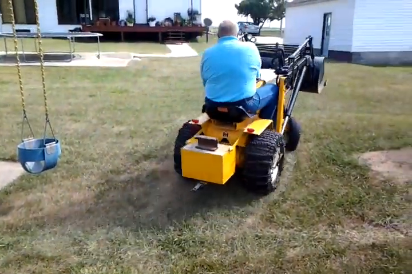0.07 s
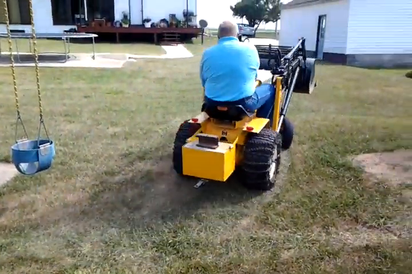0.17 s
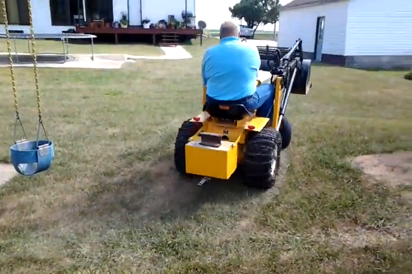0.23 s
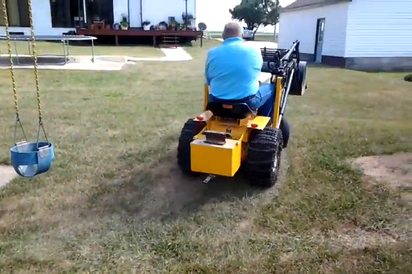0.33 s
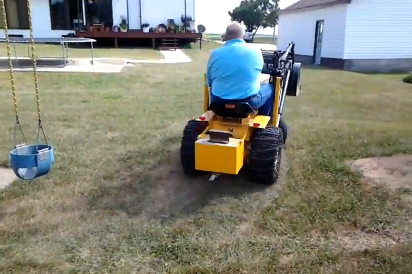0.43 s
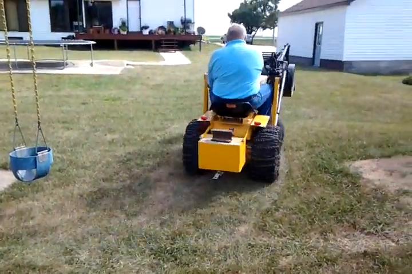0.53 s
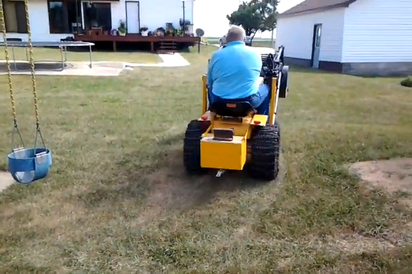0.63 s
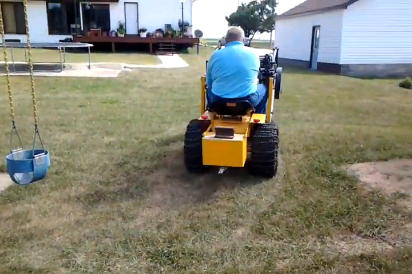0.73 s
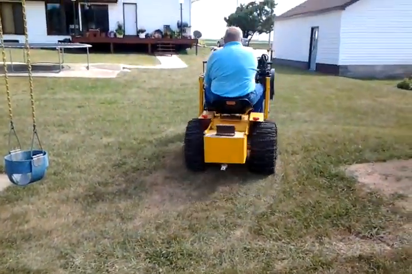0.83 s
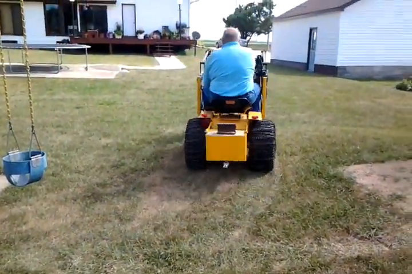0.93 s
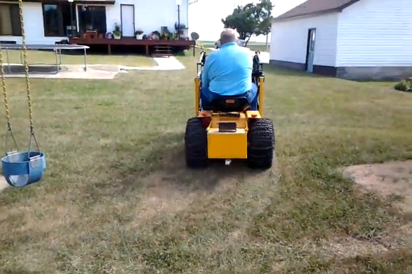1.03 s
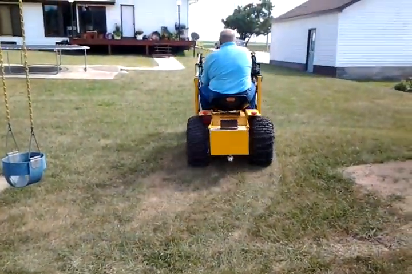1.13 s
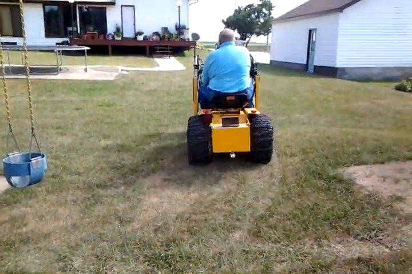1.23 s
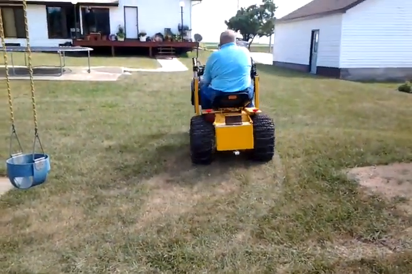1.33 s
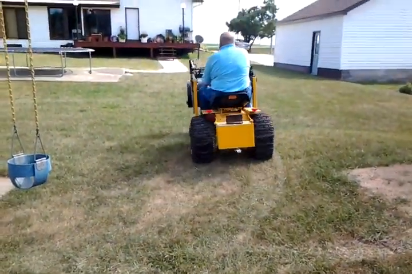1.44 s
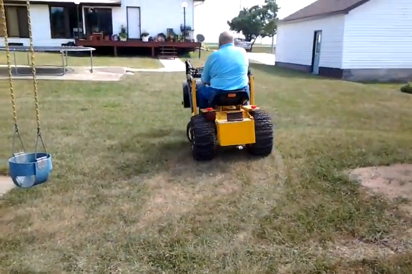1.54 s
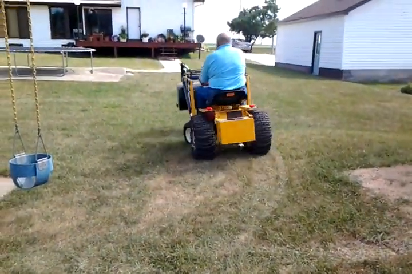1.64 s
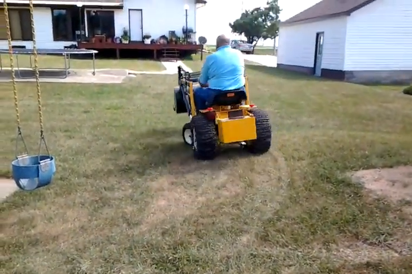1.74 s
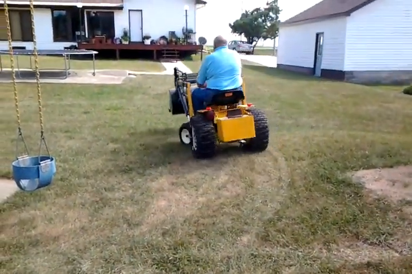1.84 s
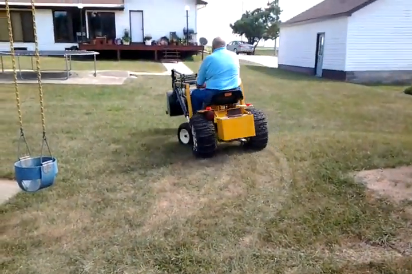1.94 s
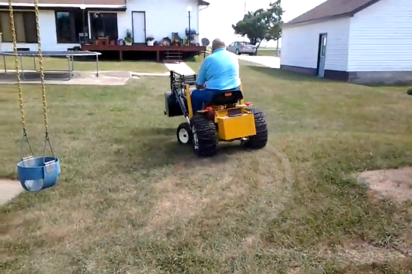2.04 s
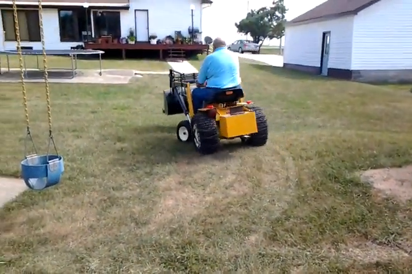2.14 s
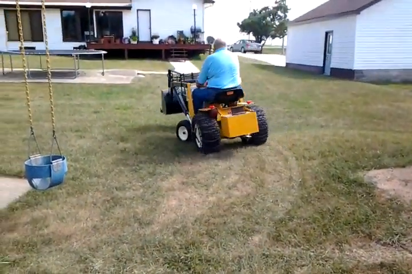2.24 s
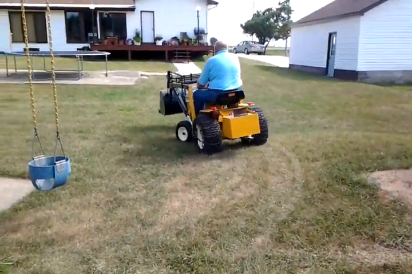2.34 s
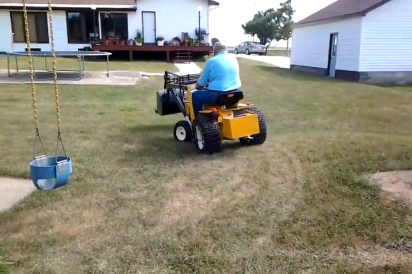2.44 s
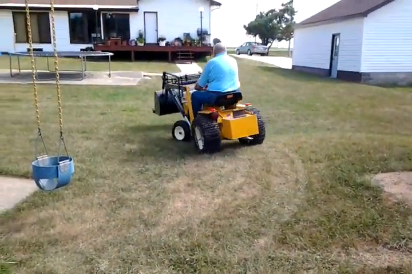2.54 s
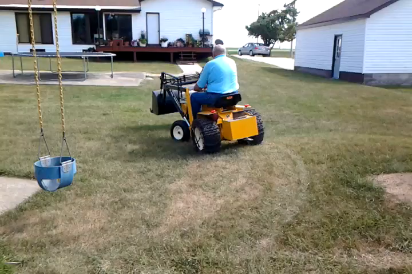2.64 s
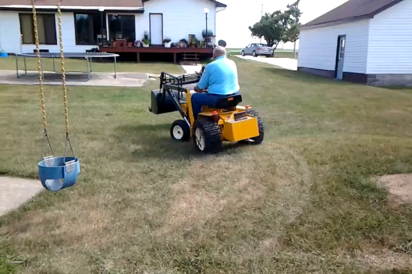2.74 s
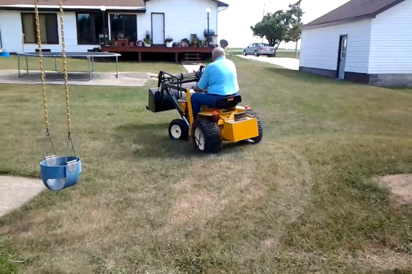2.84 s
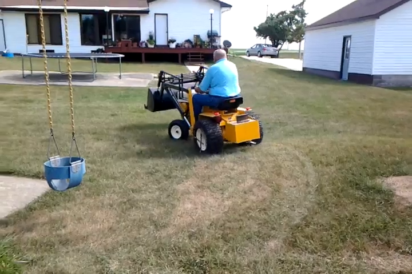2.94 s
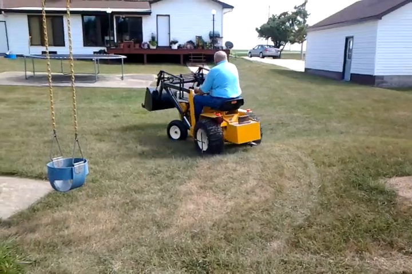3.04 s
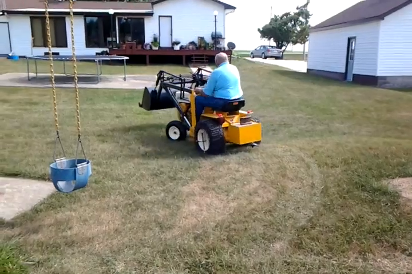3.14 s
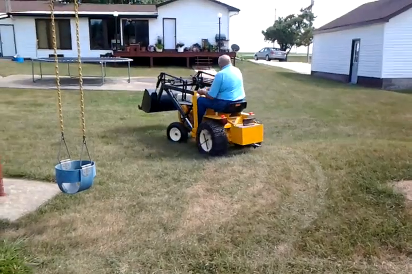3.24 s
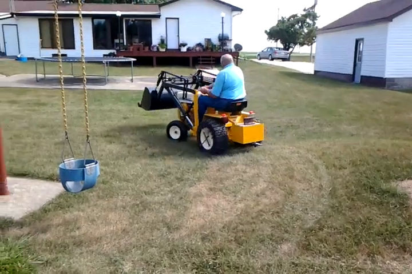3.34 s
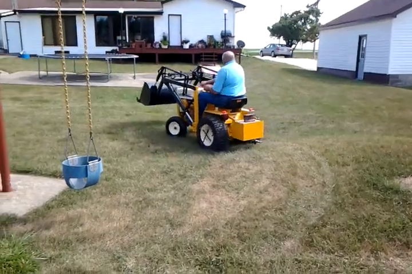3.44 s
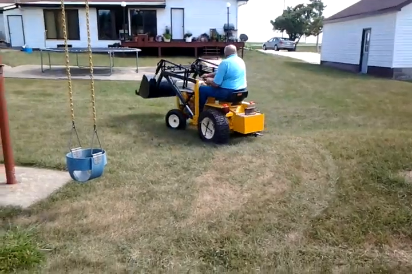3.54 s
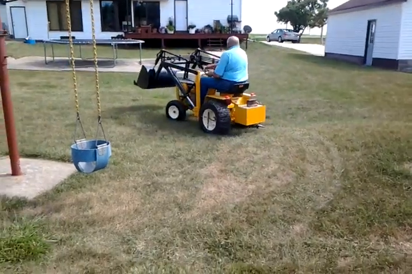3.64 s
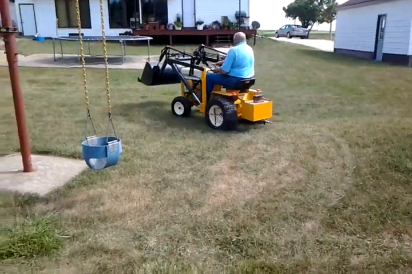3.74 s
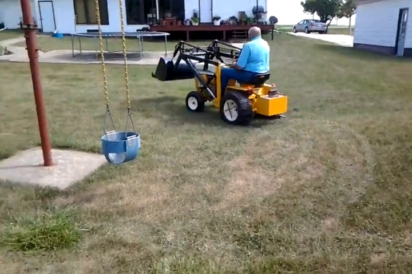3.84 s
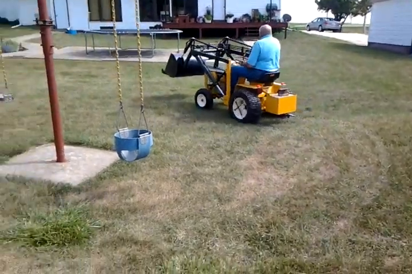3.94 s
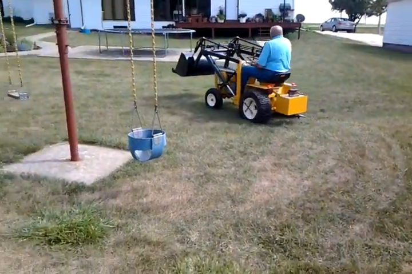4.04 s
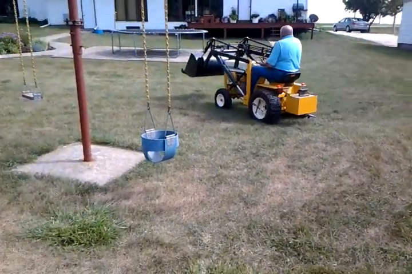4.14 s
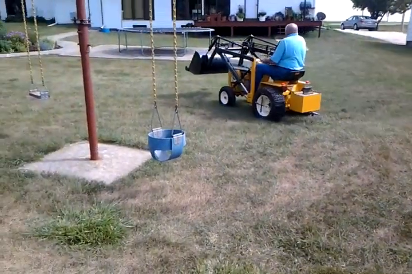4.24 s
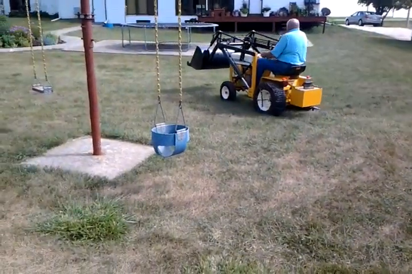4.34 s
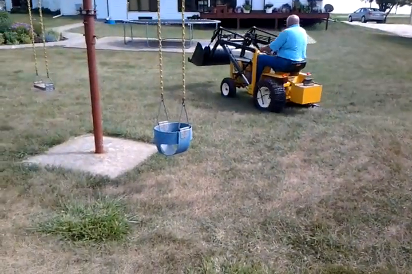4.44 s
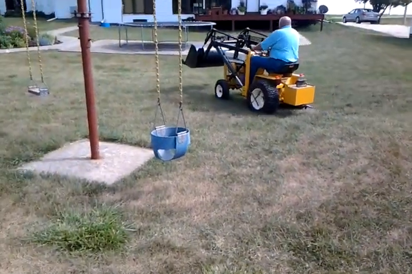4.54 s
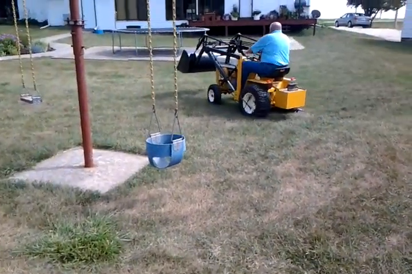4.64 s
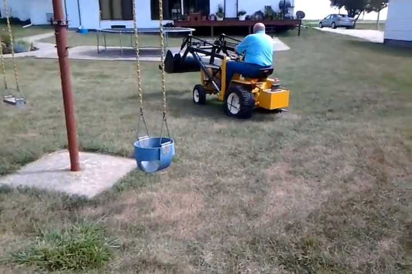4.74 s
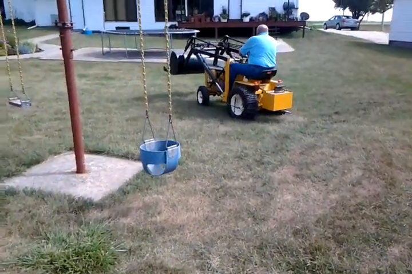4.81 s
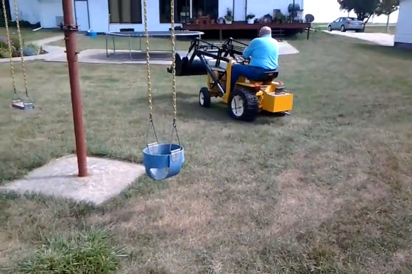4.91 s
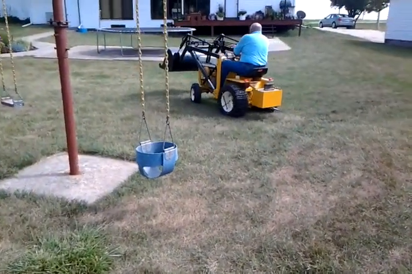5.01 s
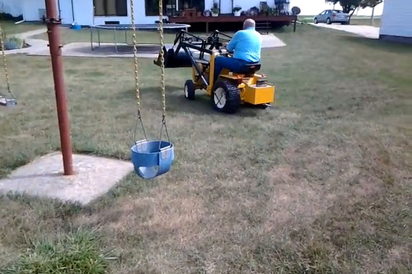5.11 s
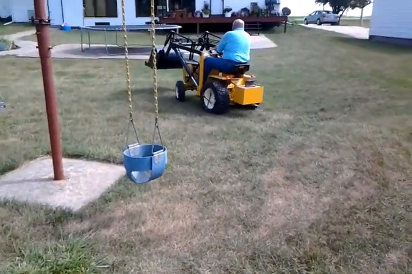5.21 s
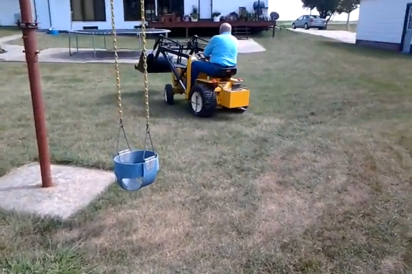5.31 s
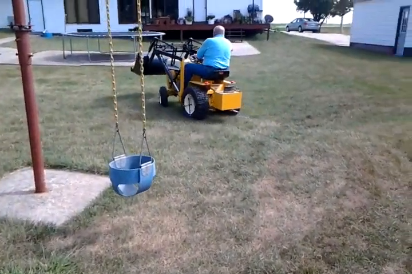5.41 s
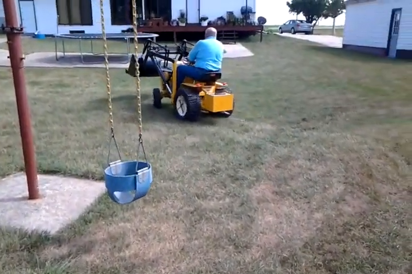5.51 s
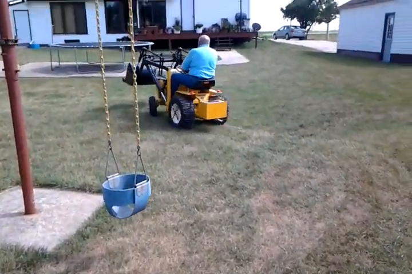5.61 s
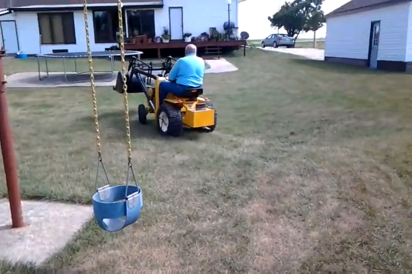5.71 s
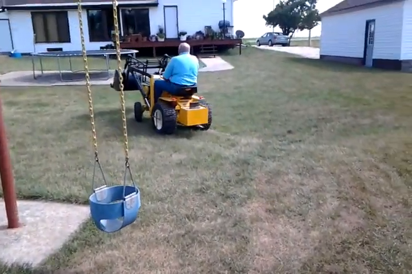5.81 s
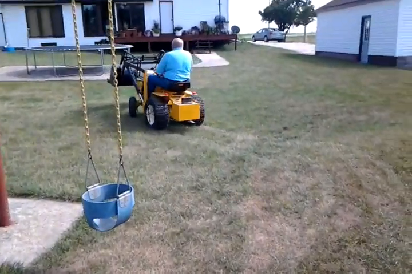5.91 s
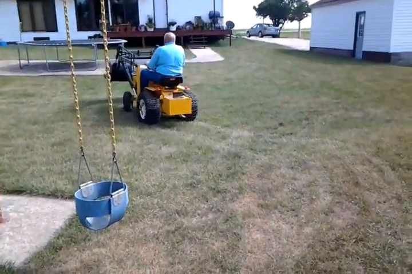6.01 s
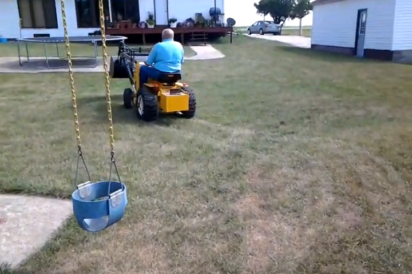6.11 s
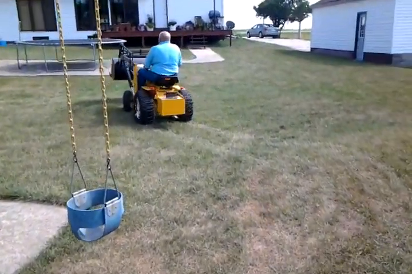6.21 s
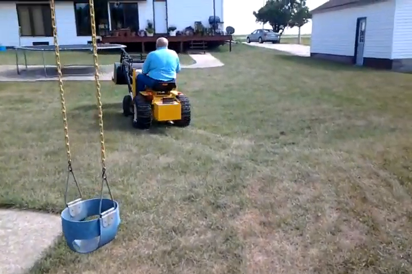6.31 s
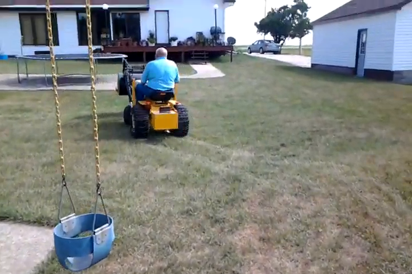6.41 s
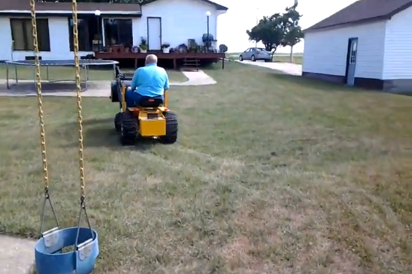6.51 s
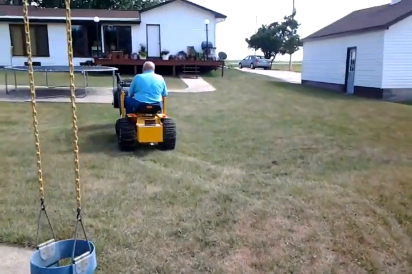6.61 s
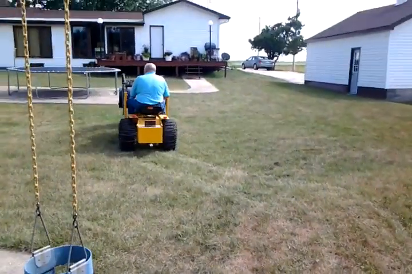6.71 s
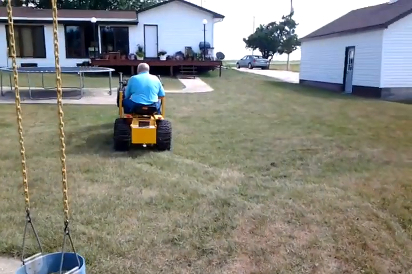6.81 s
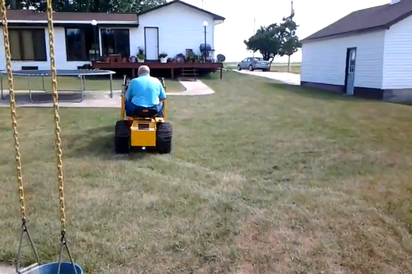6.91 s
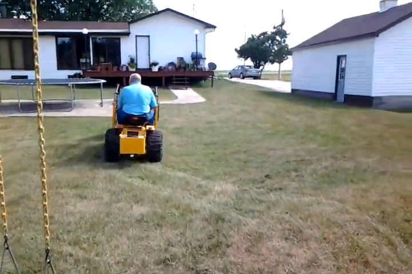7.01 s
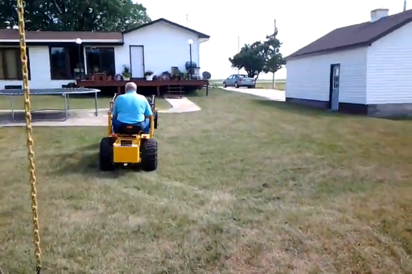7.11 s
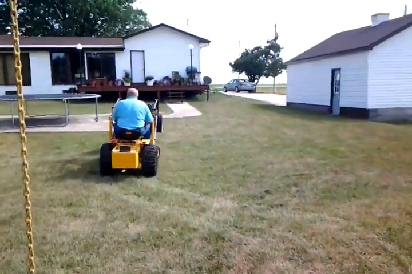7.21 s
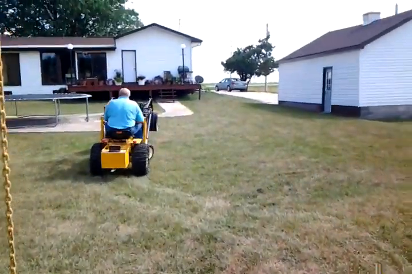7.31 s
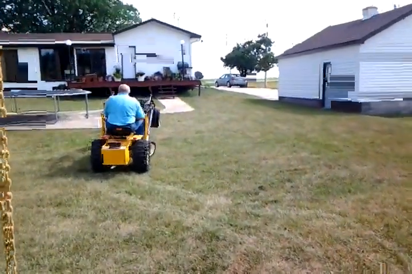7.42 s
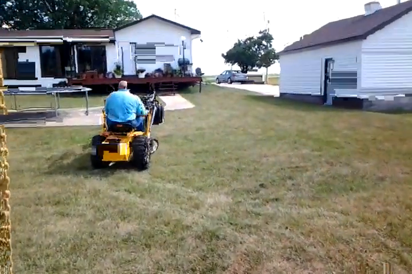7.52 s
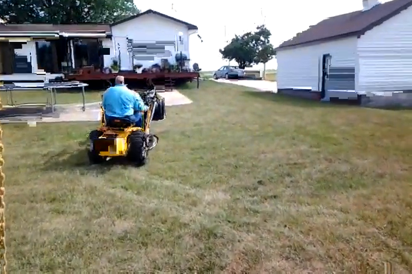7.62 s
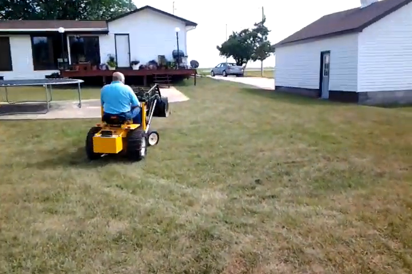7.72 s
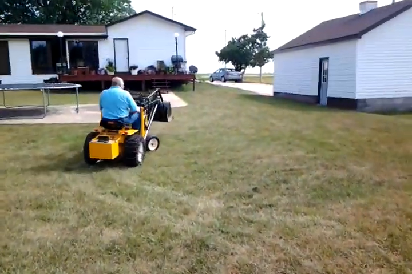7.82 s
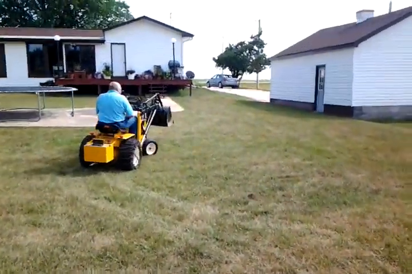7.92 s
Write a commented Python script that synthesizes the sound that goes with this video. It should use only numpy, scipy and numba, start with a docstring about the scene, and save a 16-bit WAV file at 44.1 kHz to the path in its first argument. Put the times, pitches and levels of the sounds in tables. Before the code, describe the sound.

A single-cylinder garden tractor runs throughout about eight seconds, heard from a few metres behind on a lawn. Its exhaust thumps in a fast, even chug, joined by a short intake bark, clatter from the engine block and chassis, and the rush of a cooling fan. The speed wavers only slightly. It is loudest in the first second, when a thin hydraulic whine briefly rises. From about 1 to 3 seconds it grows quieter as it moves away, then holds a fairly steady level, its tone shifting as it turns. Droning overtones swell and fade. Faint loader squeaks come in the first half second and around 4.3, 5 and 7.5 seconds, among soft swells of high hiss, with tiny chinks near 6 seconds. A house wall gives a short echo, and gentle low puffs of wind pass between about 5 and 7.5 seconds.

```python
"""On a lawn by a house, a single-cylinder four-stroke garden tractor weaves away, heard from a few metres
behind. Each cycle gives an exhaust thump and, about half a turn later, an intake gulp with a short bark.
Block and chassis clatter, the cooling fan rushes through its shroud, the hydraulic pump whines and engine
overtones swell and fade. The loader squeaks amid faint swells of treble hiss. The house wall echoes the
engine; a breeze puffs now and then."""
import sys
import numpy as np
from scipy import signal
from scipy.fft import rfft, irfft, next_fast_len
from scipy.io import wavfile
from scipy.ndimage import uniform_filter1d
from numba import njit

SR = 44100
rng = np.random.default_rng(int(sys.argv[2]) if len(sys.argv) > 2 else 0)


def master_out(mix):
    """Clip the mix to full scale and print it as 16-bit PCM to the path in sys.argv[1]."""
    frames = np.transpose(np.atleast_2d(mix))
    ceiling = np.clip(frames, -1, 1)
    pcm = np.round(ceiling * 32767).astype(np.int16)
    wavfile.write(sys.argv[1], SR, pcm)


N = 351036
T = np.arange(N) / SR


def exhaust(starts, upper_db, drone_hz):
    """Each blowdown rings the muffler; its drone wanders with the gas heat."""
    # Muffler modes, main and upper. Each row: centre in Hz, width in Hz, relative gain in dB.
    main_modes = [(138.05, 19.2, 4.5)]
    upper_modes = [(304, 10, -27.5)]
    blowdown = strokes(starts, delay_ms=1.045, soft_ms=0.99, jitter_ms=0.037, scatter_db=0.34)
    drone = undb(-8) * sweep(blowdown, drone_hz * (1 + 0.018 * walk(9)), width_hz=39.0)
    return ring(blowdown, main_modes) + undb(upper_db) * (drone + ring(blowdown, upper_modes))


def intake(starts):
    """Each gulp of air rings the air cleaner."""
    # Air cleaner modes. Each row: centre in Hz, width in Hz, relative gain in dB.
    modes = [(124.6, 40.5, 1.3), (500, 158, 14)]
    gulps = strokes(starts, delay_ms=14.59, soft_ms=1.485, jitter_ms=0.041, scatter_db=0)
    return ring(gulps, modes)


def gas_pulses(starts, phase, intake_db, upper_db, drone_hz, close, rear):
    """Exhaust and intake push the air opposite ways; the unbalanced crank shakes once a turn."""
    outflow = exhaust(starts, upper_db, drone_hz)
    inflow = intake(starts) * undb(intake_db + 0.82 * walk(12))
    gas = inflow - outflow
    gas -= close * ring(gas, [(65, 18, 1), (43, 14, -12)])  # close behind, the openings' bass cancels
    gas += rear ** 2 * ring(gas, [(52, 33, -6.5)])  # far behind, it adds
    running_rms = np.sqrt(uniform_filter1d(gas ** 2, size=SR // 2, mode="reflect"))
    shake = undb(-24) * np.cos(4 * np.pi * (phase - .2))
    return gas / running_rms + shake  # pose changes colour, not loudness


def intake_bark(starts, side):
    """The valve snaps open and rings the pipe, whose pitch rises; the ring returns once from its end."""
    # Pipe pitch as the valve opens and shuts. Each row: time into the cycle in ms, pitch in Hz.
    pipe_pitch = [(10, 600), (12.5, 645), (15.5, 775), (19, 910), (26, 780), (45, 600)]
    width_hz, return_s = 149.0, 0.0088
    snap = strokes(starts, delay_ms=11.2, soft_ms=0.2, jitter_ms=0.06, scatter_db=1)
    gust = noise() * strokes(starts, delay_ms=14, soft_ms=2.5, jitter_ms=.5, scatter_db=2)
    cycle = np.maximum(np.searchsorted(starts, T) - 1, 0)
    hz = np.interp(1000 * (T - starts[cycle]), *np.transpose(pipe_pitch))
    bark = sweep(sweep(snap + undb(14) * gust, hz, width_hz), hz, width_hz)
    bark += undb(-8.5) * late(bark, return_s)
    return unit(bark) * undb(-1.3 + 2.2 * side)


def block_clatter(starts, phase):
    """Small knocks ring the engine block, swelling once a turn."""
    # Block spectrum. Each row: frequency in Hz, relative level in dB.
    spectrum = [(450, -31), (580, -12), (680, -0.5), (800, 0.5), (930, 0.5), (1050, -15), (1200, -26),
                (1600, -43.5)]
    knocks = clatter(starts, repeat=0.15, jitter_ms=0.018)
    return unit(colour(knocks, spectrum)) * throb(2 * phase, peak=.87, depth_db=1.8)


def chassis_clatter(starts, phase):
    """The chassis rattles low, swelling slightly once a cycle."""
    # Chassis spectrum. Each row: frequency in Hz, relative level in dB.
    spectrum = [(30, -5), (110, 4), (220, 1), (320, 2.5), (400, -1.5), (520, -6.5), (640, -1), (900, -38.5)]
    knocks = clatter(starts, repeat=0.4, jitter_ms=0.078)
    return unit(colour(knocks, spectrum)) * throb(phase, peak=0.05, depth_db=0.5)


def fan(starts, phase, close, side, rear):
    """Cooling air and valve ticks, screened by the body; reflections and shroud modes come and go."""
    # Rush from close behind, the side and far behind. Each row: frequency in Hz, relative level in dB.
    close_spectrum = [(620, -34.5), (1050, -11.5), (1170, -3.5), (1540, -2), (1880, -5.5), (2140, -8.5),
                      (2580, -14), (3010, -11), (3520, -17.5), (4420, -17), (4800, -14), (5290, -19.5),
                      (5790, -18.5), (7400, -34.5), (9620, -65.5), (16300, -120)]
    side_spectrum = [(620, -40), (1050, -9), (1190, -1), (1540, 0), (1690, -3), (2170, -9), (2540, -17),
                     (2750, -10.5), (3110, -15.5), (3550, -7.5), (3940, -13.5), (4880, -17), (5560, -23),
                     (6340, -22.5), (7400, -34.5), (9620, -66), (16300, -120)]
    rear_spectrum = [(620, -32.5), (1050, 4), (1170, -14.5), (1470, -2.5), (1970, -14.5), (2380, -9.5),
                     (2780, -22), (3040, -14.5), (3380, -19.5), (3700, -11), (4040, -20), (4570, -18.5),
                     (5170, -31), (5740, -25.5), (7400, -39.5), (9620, -63), (16300, -120)]
    # Reflections off bonnet, fenders and loader. Each row: lag in ms, rms gain in dB.
    reflections = [(0.899, -19), (1.5, -20.5), (2.3, -24), (3.4, -15)]
    # Shroud modes. Each row: centre in Hz, nominal width in Hz, relative level in dB.
    shroud_modes = [(1503, 62, -0.5), (2117, 77, -4), (3090, 95, -18.5), (3600, 470, -15.5),
                    (4270, 110, -10.5), (4790, 150, -12)]
    rush = clatter(starts, repeat=0.36, jitter_ms=.1) * throb(phase, peak=0.39, depth_db=0.57)
    views = (close_spectrum, close), (side_spectrum, (1 - close) * side), (rear_spectrum, rear)
    air = sum(share * unit(colour(rush, spectrum)) for spectrum, share in views)
    air += sum(undb(db) * walk(4) * late(air, ms / 1000) for ms, db in reflections)
    shroud = sum(whine(hz, 1.3 * width_hz, waver=.018, rate_hz=3) * undb(db + 2.5 * walk(5))
                 for hz, width_hz, db in shroud_modes)
    return undb(4) * air + undb(-8.5) * shroud


def house_echo(engine, metres):
    """The wall returns the engine slightly sharp as the tractor nears it, so overtones beat slowly."""
    # Extra travel time by way of the wall. Each row: time in seconds, lag in ms.
    wall_lag = [(0, 112), (2.4, 101), (5.7, 93), (6.2, 88.8), (7.96, 68.4)]
    lag_s = curves(wall_lag)[0] / 1000
    path_m = metres + 343 * lag_s
    return undb(1) * metres / path_m * late(engine, lag_s)


def pump_whine(phase):
    """The hydraulic pump whines on one engine order."""
    # Pump loudness. Each row: time in seconds, level in dB.
    levels = [(0, -44), (.33, -39), (.62, -53), (.85, -66), (1.2, -53), (1.5, -53), (2.3, -56), (3.3, -56),
              (3.65, -51.5), (3.95, -68), (6.4, -66), (6.85, -51), (7.2, -58), (7.96, -59)]
    return engine_order(phase, multiple=21) * undb(curves(levels)[0])


def overtone_drones(phase):
    """Engine overtones swell and fade as droning tones."""
    # Drones. Each row: peak time in seconds, half-width in seconds, firing-rate multiple, level in dB.
    drones = [(2.9, .8, 11, -49), (.6, .7, 12, -51), (1.2, .95, 13, -46), (7.5, .7, 13, -49),
              (1.25, .25, 14, -54), (2.35, .35, 14, -45.5), (3.15, .22, 14, -42), (7.3, .6, 14, -53),
              (.46, .14, 16, -47), (1.85, .22, 16, -47), (3.2, .5, 16, -56), (4.35, .55, 24, -53),
              (5.6, .7, 24, -55), (2.25, .3, 30, -47), (.1, .13, 36, -45), (1.26, .19, 36, -40.5),
              (1.82, .3, 36, -43), (3.52, .13, 36, -46), (4.9, 1.1, 36, -55), (6.8, .25, 36, -51),
              (7.3, .2, 36, -49)]
    return sum(engine_order(phase, multiple) * swell(peak_s, half_s) * undb(db)
               for peak_s, half_s, multiple, db in drones)


def squeaks_and_hiss():
    """Brief squeaks and chinks, plus faint, longer swells of narrow treble hiss."""
    # Narrow noise swells. Each row: peak time in seconds, half-width in seconds, pitch in Hz,
    # nominal bandwidth in Hz, level in dB.
    swells = [(0.122, 0.11, 1513, 100, -40), (0.396, 0.08, 1535, 100, -43), (.5, .1, 3070, 110, -53.5),
              (1.95, 0.22, 3020, 200, -54.5), (2.003, .2, 4520, 150, -57.5), (2.05, 0.45, 4990, 170, -62),
              (2.906, 0.21, 2130, 150, -54.5), (3.15, 0.19, 2290, 240, -54), (3.555, 0.22, 3670, 397, -59),
              (4.254, 0.1, 1520, 130, -45), (4.45, .12, 2750, 200, -64), (4.3, .6, 4980, 400, -65),
              (4.944, .1, 1820, 220, -50), (6.15, 0.38, 2120, 130, -55.5), (5.3, 0.27, 2140, 171, -56.5),
              (5.72, 0.0063, 6900, 804, -61), (5.766, .008, 6900, 796, -62), (5.968, 0.16, 4220, 60, -58),
              (6.422, 0.12, 4220, 54.9, -58.5), (6.457, 0.014, 5940, 2000, -57),
              (6.462, .025, 4250, 300, -56), (7.26, 0.15, 2560, 129, -59), (7.46, 0.13, 1617, 100, -47),
              (7.85, .12, 2370, 120.6, -57.5)]
    return sum(undb(db) * swell(peak_s, half_s) * whine(hz, 0.85 * width_hz, waver=.008, rate_hz=14)
               for peak_s, half_s, hz, width_hz, db in swells)


def breeze():
    """Soft low puffs of wind."""
    # Puffs. Each row: peak time in seconds, half-width in seconds, level in dB.
    puffs = [(4.8, .12, -46), (5.76, .14, -40), (6.7, .12, -44), (7.2, .25, -44)]
    rumble = unit(shape(noise(), lambda f: band(f, hz=40, width_hz=45) ** 2))
    return rumble * sum(undb(db) * swell(peak_s, half_s) for peak_s, half_s, db in puffs)


def strokes(starts, delay_ms, soft_ms, jitter_ms, scatter_db):
    """One Gaussian push a cycle, scattered in time and size."""
    timing, size = rng.standard_normal((len(starts), 2)).T
    at = np.round((starts + (delay_ms + jitter_ms * timing) / 1000) * SR).astype(int)
    inside = (at >= 0) & (at < N)
    clicks = np.bincount(at[inside], undb(scatter_db * size[inside]), N)
    return shape(clicks, lambda f: np.exp(-.5 * (2 * np.pi * f * soft_ms / 1000) ** 2))


def clatter(starts, repeat, jitter_ms, patterns=6):
    """A slowly changing run of knocks recurs each cycle with power share `repeat`; the rest is noise."""
    cycle_samples = int(np.mean(np.diff(starts)) * SR)
    beats = strokes(starts, delay_ms=0, soft_ms=0, jitter_ms=jitter_ms, scatter_db=2.2)
    knocks = 0
    for k in range(patterns):
        fade = np.cos(np.pi / 2 * np.clip(T / T[-1] * (patterns - 1) - k, -1, 1))
        knocks += fade * signal.oaconvolve(beats, rng.standard_normal(cycle_samples))[:N]
    return np.sqrt(repeat) * unit(knocks) + np.sqrt(1 - repeat) * noise()


def engine_order(phase, multiple):
    """A tone on a multiple of the firing rate, wavering in phase and level."""
    return np.sqrt(2) * np.cos(2 * np.pi * multiple * phase + 0.2 * walk(7)) * undb(1.1 * walk(15))


def whine(hz, width_hz, waver, rate_hz):
    """A narrow noisy mode whose pitch wavers by the share `waver`."""
    mode = shape(noise(), lambda f: band(f, hz, width_hz) ** 2)
    return unit(late(mode, np.cumsum(waver * walk(rate_hz)) / SR))


def throb(phase, peak, depth_db):
    """One swell per unit of phase, greatest at `peak`."""
    return unit(undb(depth_db * np.cos(2 * np.pi * (phase - peak))))


def swell(peak_s, half_s):
    """Gaussian envelope, 1/e at half_s from the peak."""
    return np.exp(-((T - peak_s) / half_s) ** 2)


def shape(x, response):
    """Filter by a function of frequency."""
    size = next_fast_len(N + SR // 2)
    hz = np.maximum(np.fft.rfftfreq(size, 1 / SR), 1e-3)
    return irfft(rfft(x, size) * response(hz), size)[:N]


def band(f, hz, width_hz):
    """Response of one resonance, gain 1 at its centre."""
    return 1 / (1 + 1j * (f * f - hz * hz) / (f * width_hz))


def ring(x, modes):
    """Parallel resonances. Each row: centre in Hz, width in Hz, gain in dB."""
    return shape(x, lambda f: sum(undb(db) * band(f, hz, width_hz) for hz, width_hz, db in modes))


def colour(x, points):
    """Filter by a curve through (Hz, dB) points."""
    hz, db = np.transpose(points)
    return shape(x, lambda f: undb(np.interp(np.log(f), np.log(hz), db, left=-90, right=-90)))


@njit
def sweep(x, hz, width_hz):
    """State-variable resonance with a moving centre, peak gain 1."""
    y = np.empty(len(x))
    band_state, low_state = 0., 0.
    for i in range(len(x)):
        g, damping = np.tan(np.pi * hz[i] / SR), width_hz / hz[i]
        bandpass = (band_state + g * (x[i] - low_state)) / (1 + g * (g + damping))
        band_state = 2 * bandpass - band_state
        low_state += 2 * g * bandpass
        y[i] = damping * bandpass
    return y


def late(x, lag_s):
    """Delay by a time that may vary."""
    return np.interp(np.abs(T - lag_s) % T[-1], T, x)


def noise():
    """White noise."""
    return rng.standard_normal(N)


def walk(rate_hz):
    """Smooth random wander, rms 1."""
    hold = int(SR / rate_hz)
    steps = np.repeat(rng.standard_normal(N // hold + 1), hold)
    return unit(uniform_filter1d(uniform_filter1d(steps, hold), hold)[:N])


def curves(table):
    """Columns of a timed table, interpolated per sample."""
    times_s, *columns = np.transpose(table)
    return [np.interp(T, times_s, column) for column in columns]


def undb(db):
    """Decibels to gain."""
    return 10 ** (np.asarray(db) / 20)


def unit(x):
    """Scale to rms 1."""
    return x / np.sqrt(np.mean(x ** 2))


def distance_gain(metres, db, loss_db):
    """Gain of `db` at 3 m, less `loss_db` per doubling of distance."""
    return undb(db - loss_db * np.log2(metres / 3))


def scene():
    """The engine's parts follow one cycle phase; distance and pose set their levels and colours."""
    # Governed speed, hunting a little. Each row: time in seconds, firing rate in Hz.
    speed = [(0.0, 22.112), (0.26, 21.64), (0.94, 21.962), (1.15, 22.335), (1.56, 22.353), (2.08, 22.96),
             (2.51, 22.836), (3.0, 22.998), (3.84, 22.06), (4.33, 21.921), (5.5, 22.08), (6.49, 21.935),
             (6.78, 22.455), (7.08, 21.989), (7.37, 22.449), (7.67, 21.852), (7.96, 22.744)]
    # The drive away. Each row: time in seconds, distance in metres.
    route = [(0, 2.97), (.55, 2.64), (1.15, 3.12), (1.55, 3.84), (2.2, 4.04), (2.6, 4.66), (3.2, 5.46),
             (3.6, 5.3), (4.2, 5.6), (5.2, 5.2), (6.4, 6.14), (7.1, 6.5), (7.96, 5.7)]
    # How the tractor stands. Each row: time in seconds, side-on share (0-1), intake against exhaust
    # in dB, gain of the upper muffler modes in dB, muffler drone in Hz.
    pose = [(0, 0, 4.5, 5, 159), (.9, 0, 6, 8, 181), (1.6, 0.1, 4, 9.5, 191.4), (2.4, 0.55, 5, 9, 191),
            (3.4, 0.94, 2, 6.5, 172), (4.3, 0.9, 0, -9.5, 205), (5, 1, -7, -0.5, 210),
            (6.3, 0.82, 2.5, 3, 194), (6.7, 0.03, -1.5, 8, 201), (7.96, 0.3, -2.5, 5, 195)]
    firing_hz, = curves(speed)
    metres, = curves(route)
    side, intake_db, upper_db, drone_hz = curves(pose)
    near_m, far_m = 1.7, 5.85
    close = np.clip((far_m - metres) / (far_m - near_m), 0, 1)
    rear = (1 - close) * (1 - side)
    bay_db = 3.5 * swell(0, 0.56)  # engine bay in view until the driver's back swings in front
    screen_db = 16.5 * rear ** 2  # driver and body hide the intake from far behind

    phase = .4943 + np.cumsum(firing_hz) / SR  # in cycles of two crank turns
    starts = np.interp(np.arange(1, int(phase[-1]) + 1), phase, T)  # in seconds
    starts = np.append(starts[0] - 1 / firing_hz[0], starts)
    starts += .00007 * rng.standard_normal(len(starts))

    gas = gas_pulses(starts, phase, intake_db, upper_db, drone_hz, close, rear)
    engine = gas * distance_gain(metres, db=-19.5, loss_db=6)
    engine += intake_bark(starts, side) * distance_gain(metres, db=-41 - screen_db, loss_db=1.3)
    engine += block_clatter(starts, phase) * distance_gain(metres, db=-39.5 + bay_db, loss_db=2.5)
    engine += chassis_clatter(starts, phase) * distance_gain(metres, db=-35, loss_db=9)
    engine += fan(starts, phase, close, side, rear) * distance_gain(metres, db=-46.5 + bay_db, loss_db=3)
    tones = pump_whine(phase) + overtone_drones(phase)
    return (engine + house_echo(engine, metres) + tones + squeaks_and_hiss() + breeze())[None]


def record(dry):
    """A steep low-pass removes the upper treble."""
    cutoff_hz = 7550
    return signal.sosfilt(signal.ellip(12, .2, 80, cutoff_hz, fs=SR, output="sos"), dry)


dry = scene()
out = record(dry)
master_out(out)
```